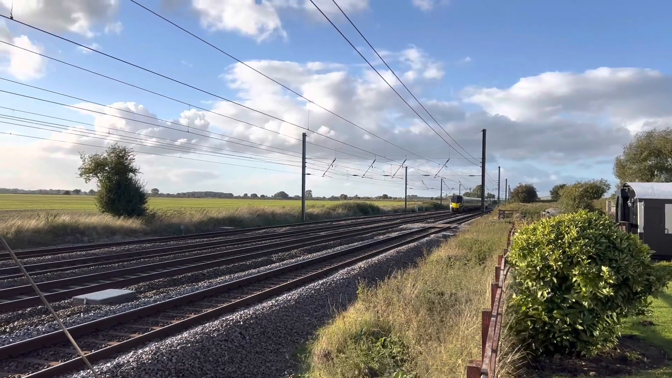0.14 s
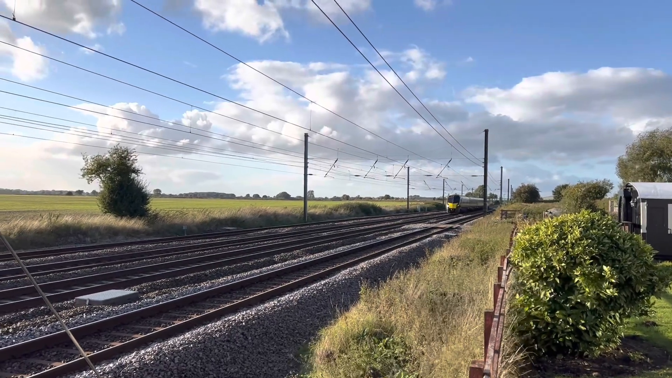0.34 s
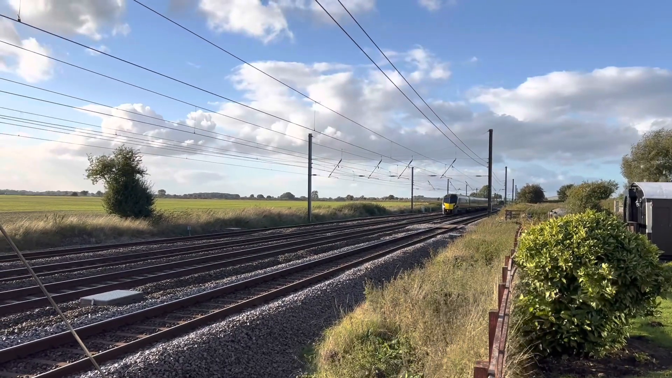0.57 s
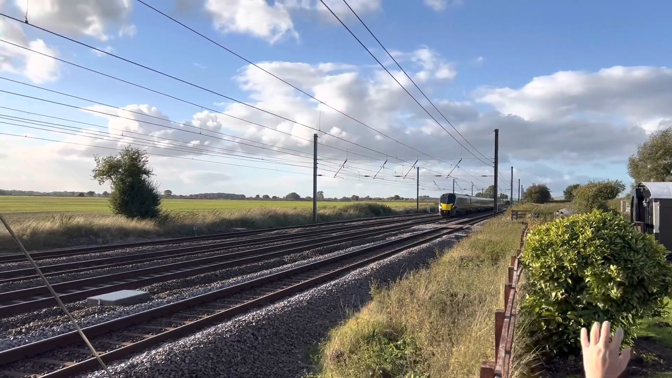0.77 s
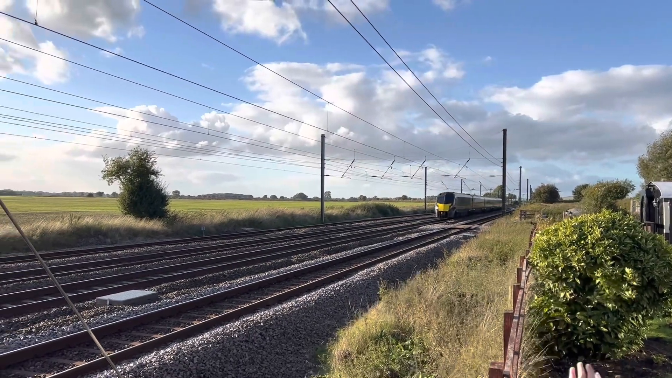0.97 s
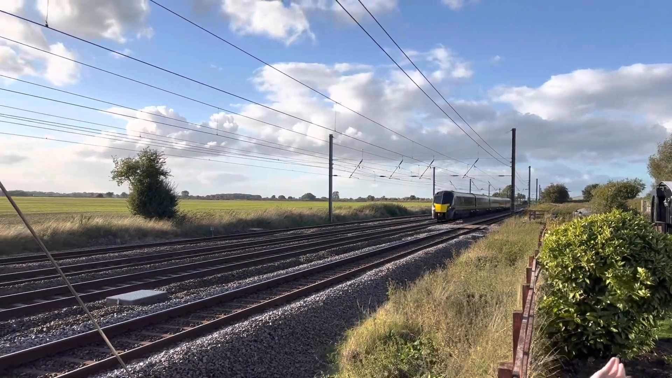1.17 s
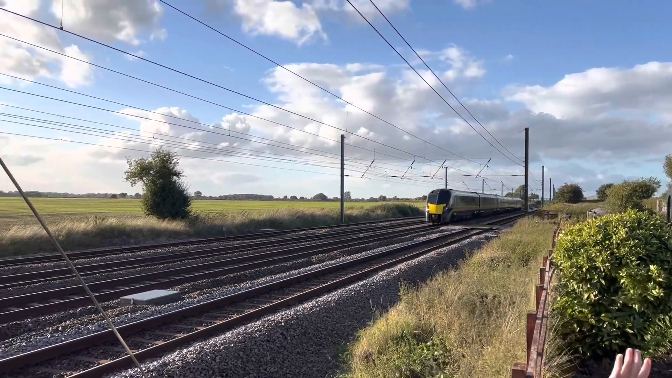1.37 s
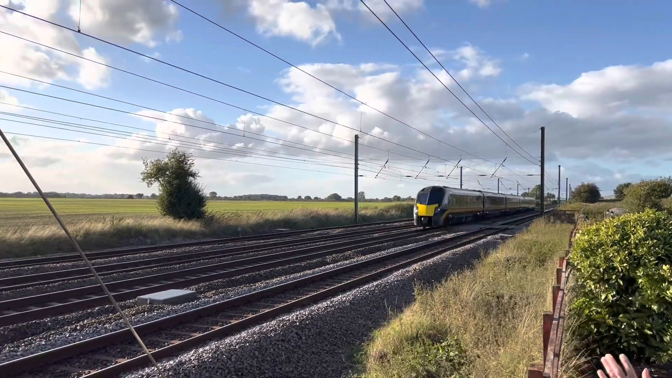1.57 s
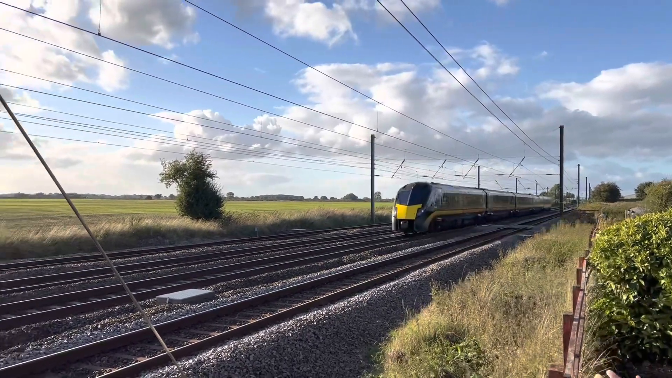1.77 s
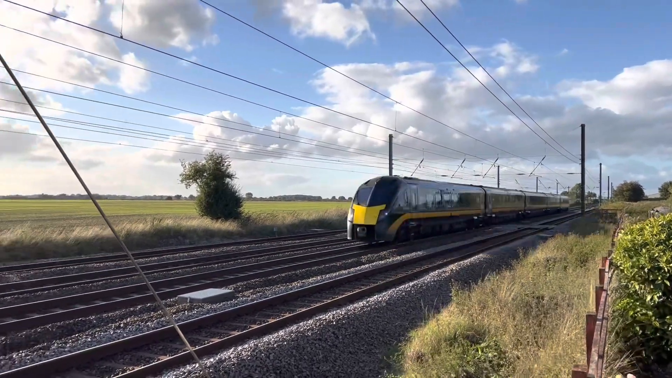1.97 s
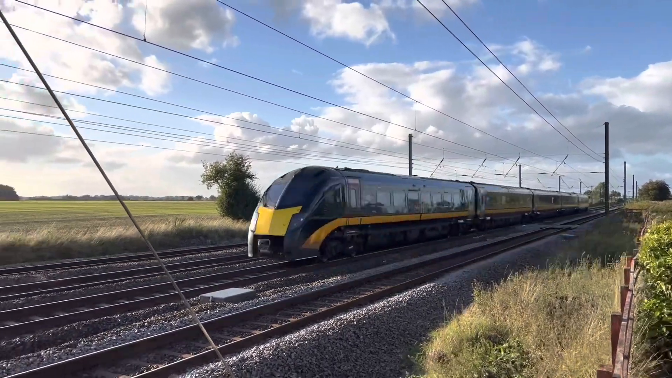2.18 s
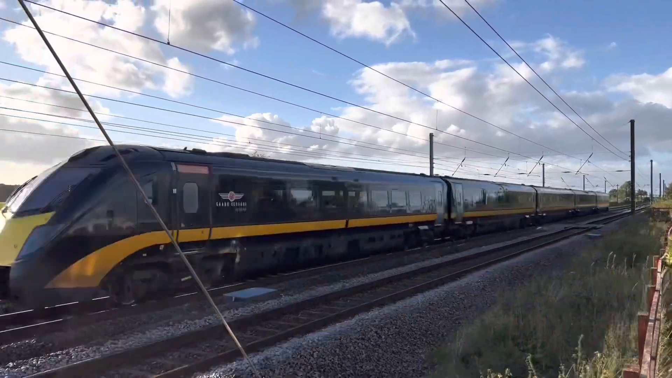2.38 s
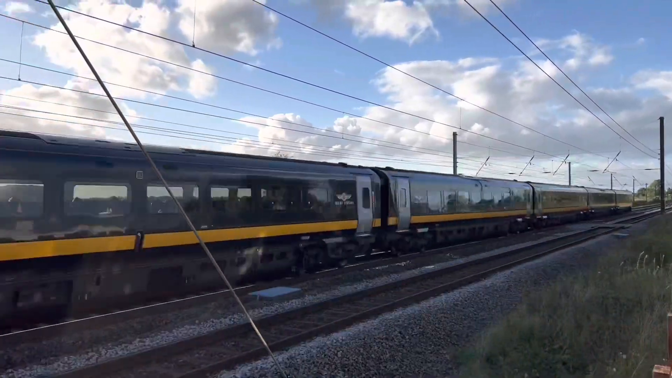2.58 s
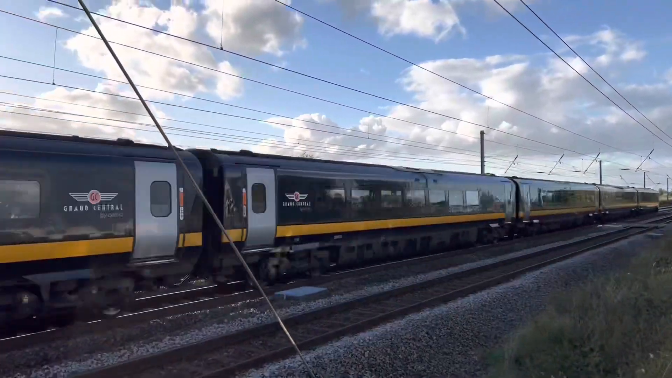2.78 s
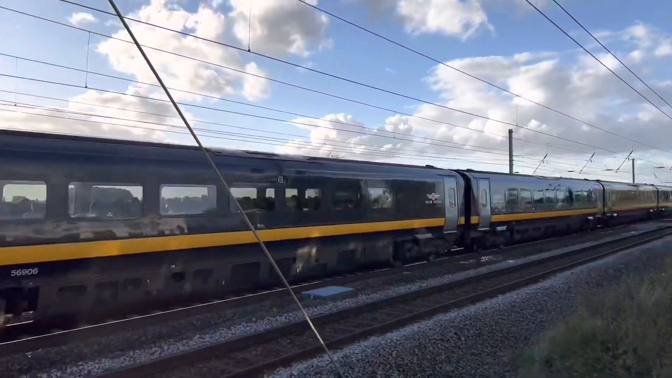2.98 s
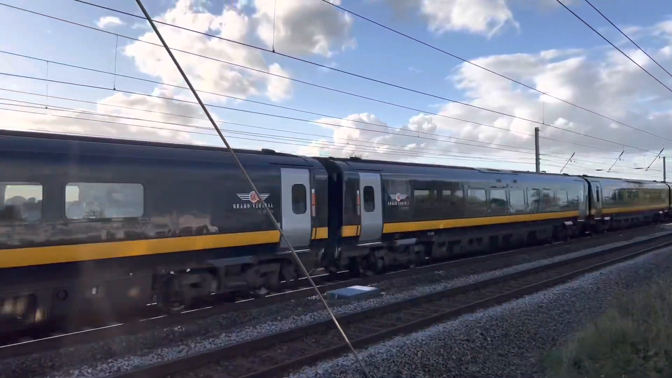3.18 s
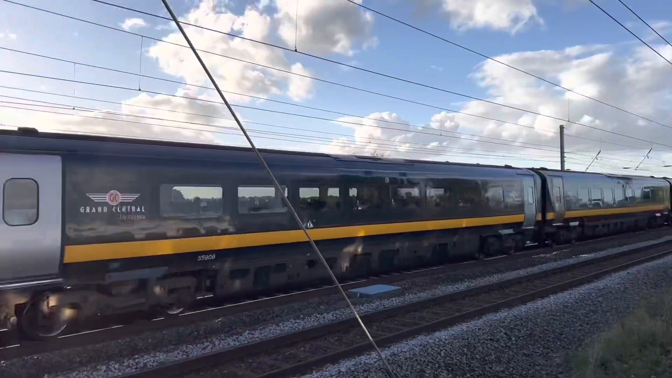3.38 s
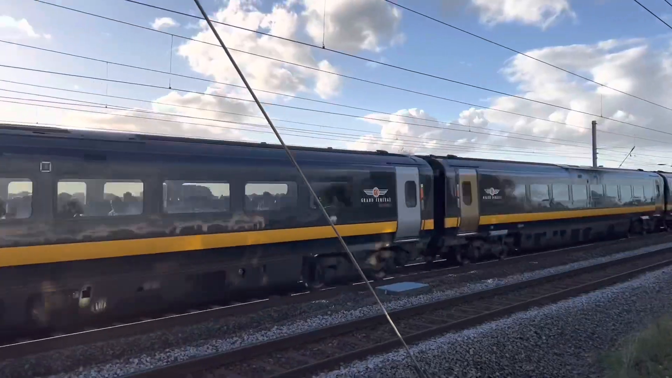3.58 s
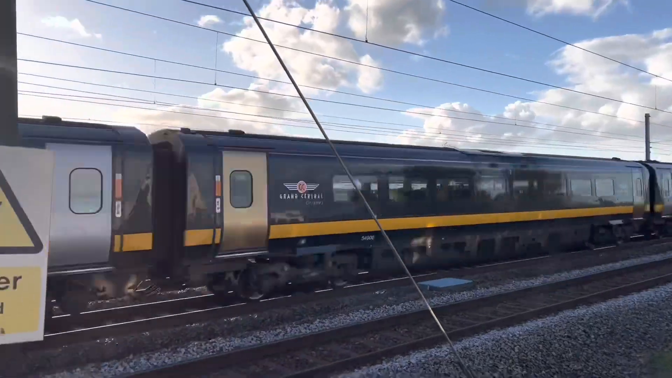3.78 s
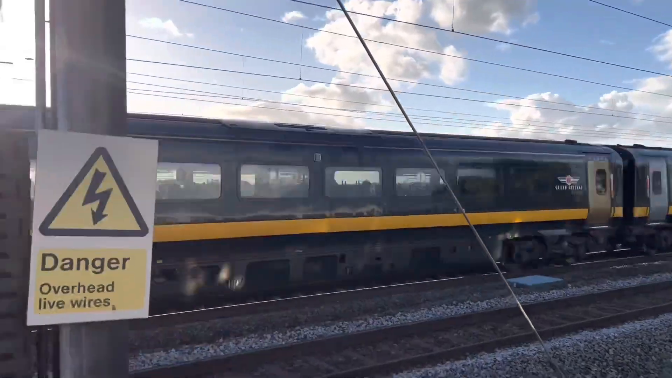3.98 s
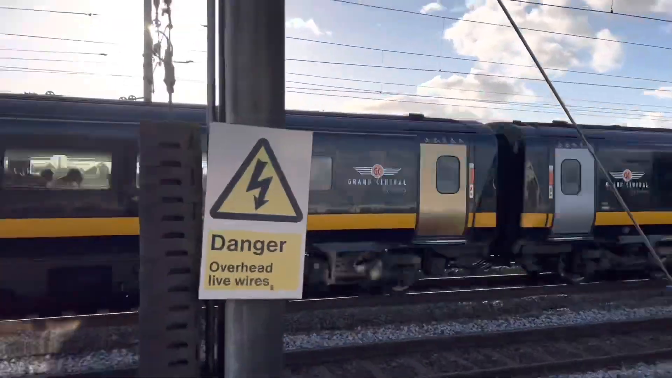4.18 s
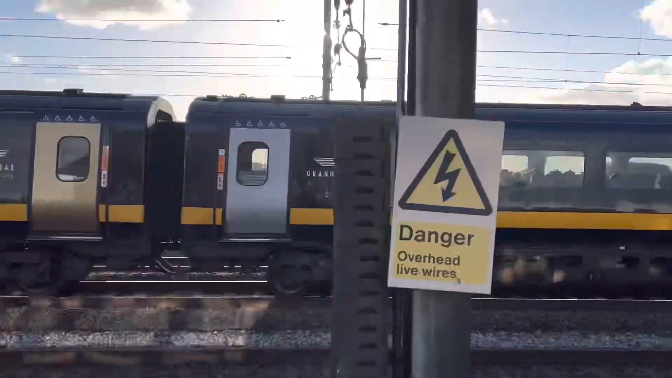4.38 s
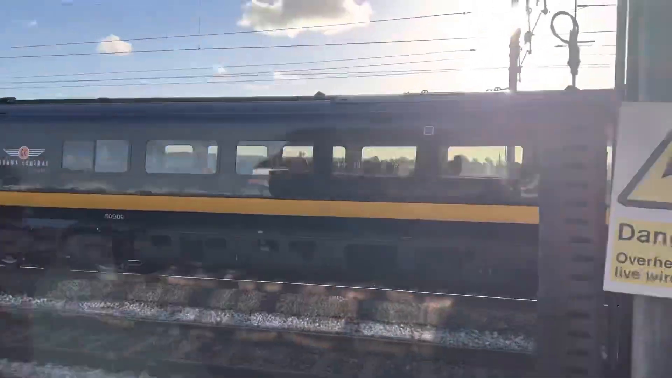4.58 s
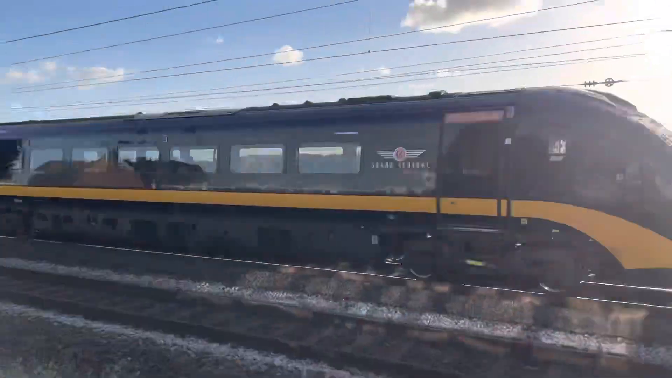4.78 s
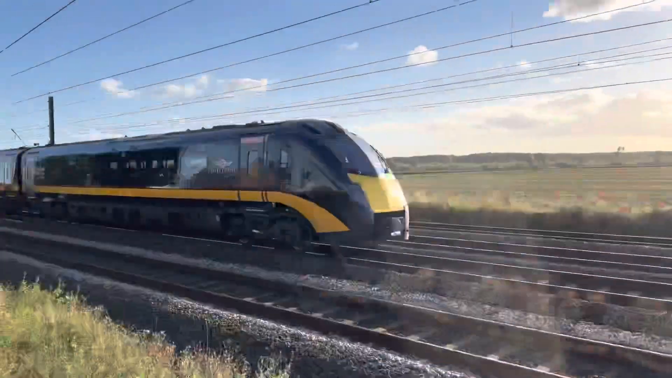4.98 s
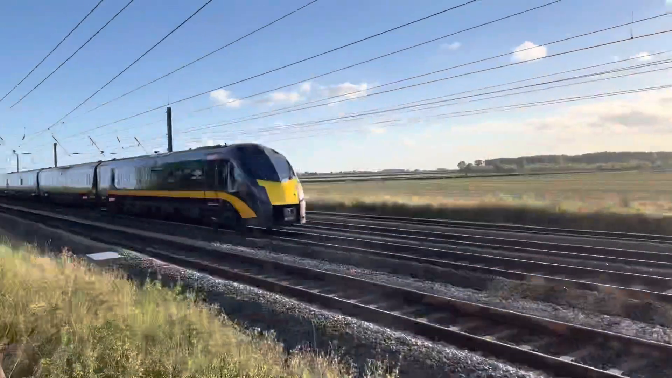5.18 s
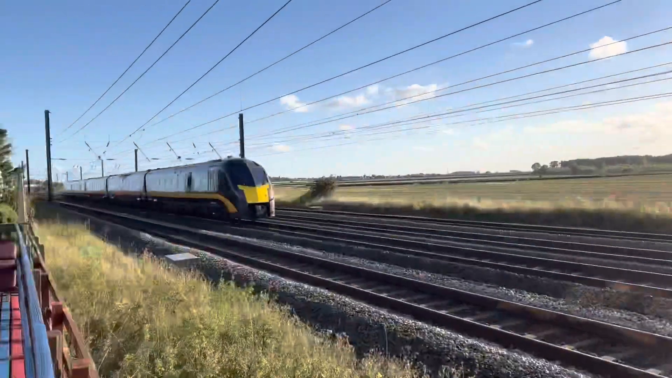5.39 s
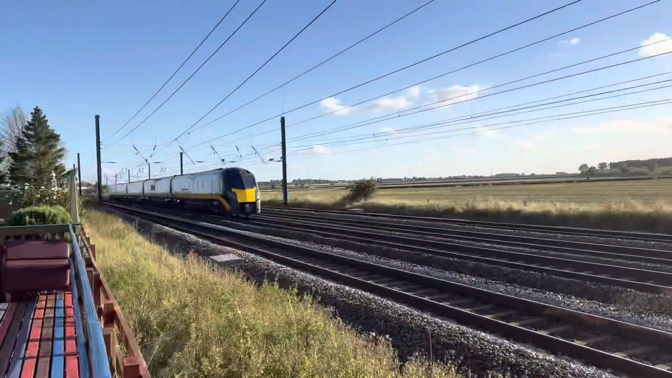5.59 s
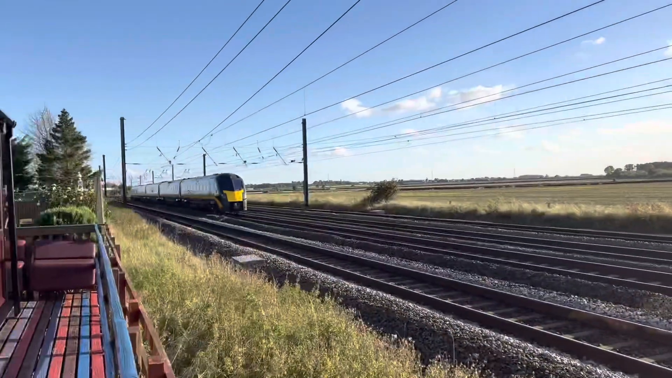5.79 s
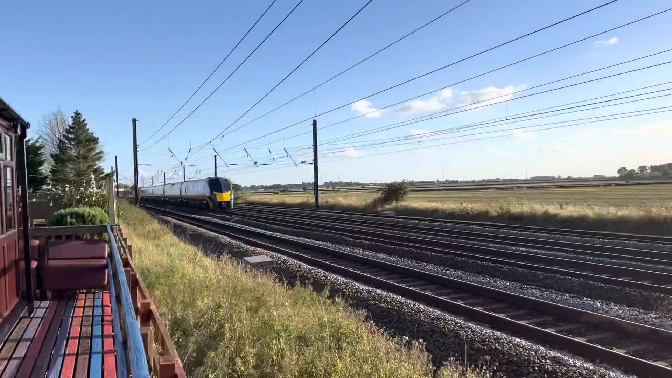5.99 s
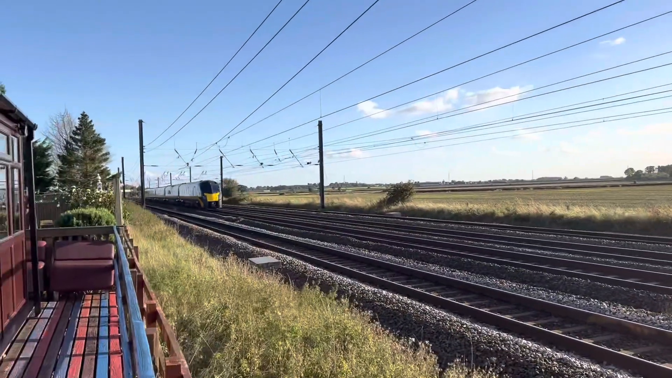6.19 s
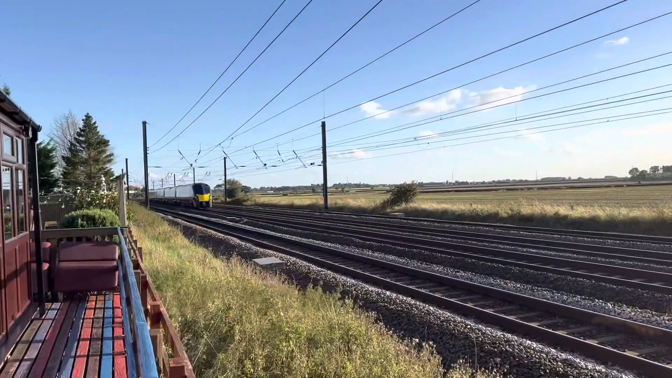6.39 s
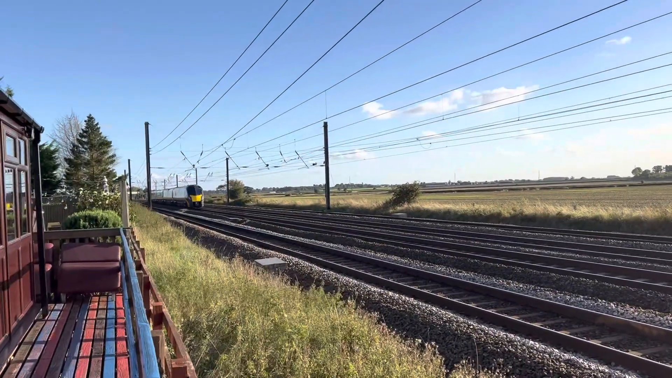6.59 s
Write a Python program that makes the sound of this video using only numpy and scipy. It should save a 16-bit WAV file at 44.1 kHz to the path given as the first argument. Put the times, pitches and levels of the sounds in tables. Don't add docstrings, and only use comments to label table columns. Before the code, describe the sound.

A fast train rushes past a few metres away in open fields, wheels roaring and gears whining downward, after blustery wind buffets the microphone.

```python
import sys
import numpy as np
from scipy import signal
from scipy.fft import rfft, irfft, next_fast_len
from scipy.io import wavfile
from scipy.ndimage import uniform_filter1d, map_coordinates

SR = 44100
rng = np.random.default_rng(int(sys.argv[2]) if len(sys.argv) > 2 else 0)


def field_ratio(decibels):
    return 10 ** (np.asarray(decibels, dtype=float) / 20)


def to_wav(sig):
    pcm = np.clip(np.atleast_2d(sig), -1, 1) * 32767
    pcm = np.round(pcm).astype(np.int16)
    wavfile.write(sys.argv[1], SR, pcm.T)


N = 292989

# t/s, nearness/dB, brightness/dB
TRAIN_PASS = [(0, -48.5, -3), (.37, -48, -1), (.61, -46, -2.5), (1.5, -40, .5), (1.8, -35.5, 0.5),
              (2.03, -30.5, 0.2), (2.25, -27, 0), (2.5, -22.5, -0.1), (2.75, -22, 1.5), (3.1, -24, .8),
              (3.4, -22.5, -0.6), (4.03, -25, -1.3), (4.48, -24.5, -.5), (4.65, -28, 0.5),
              (5.16, -35.5, 1.4), (5.4, -41.5, 2.5), (5.85, -43, 2), (6.64, -49.5, 1.5)]
# f/Hz, density/dB per Hz
ROAR_SPECTRUM = [(210, -67), (350, -15.5), (564, -7.5), (659, -2), (790, -3), (865, -4.5), (1290, -7.5),
                 (1330, -16), (1780, -10.5), (2500, -26.5), (3250, -57), (5500, -120)]
WHEEL_SPECTRUM = [(710, -39), (1200, -8), (1470, -1), (1710, -9), (1900, -4.5), (1990, -1), (2160, -4.5),
                  (2660, -5.5), (3080, -8), (4000, -9), (4870, -12.5), (6080, -14.5), (8500, -24.5),
                  (11000, -13), (18700, -120)]
HISS_SPECTRUM = [(1470, -38), (2500, -14.5), (3200, -8.5), (3920, -17), (4270, -24), (4630, -12),
                 (5920, -13), (7030, -9), (9000, -10), (11700, -59), (19800, -120)]
AIR_SPECTRUM = [(8700, -39), (9100, 6), (10200, -8), (11000, 4), (12500, -1.5), (13500, -3), (14300, -4),
                (15000, -9), (15800, -27)]
# f/Hz, likeness/0-1
TRAIN_LIKENESS = [(100, .9), (600, 0.71), (1200, 0.25), (2300, 0.69), (4000, 0.11), (7000, 0.3),
                  (9000, 0.18), (11000, 0.94), (13000, 0.74)]
# f/Hz, rms/dB
RAIL_AHEAD = [
    [(2062, -46), (2433, -51), (2745, -50), (3429, -54)],
    [(622, -47), (6869, -58), (7009, -66), (7553, -62), (7860, -64), (8183, -66), (8856, -65)] + [(11590, -62), (12269, -58), (12947, -64), (13625, -67), (14309, -67)],
]
# f/Hz, rms/dB
RAIL_BEHIND = [
    [(1927, -49), (2573, -60)],
    [(775.2, -52), (942.1, -52), (1157, -55), (1254, -52), (1739, -57), (1927, -56)] + [(3510, -61), (4027, -67), (5227, -66), (5884, -65), (6444, -66), (7084, -60), (7736, -60), (8080, -70), (8419, -68)] + [(11687, -64), (12328, -66), (12979, -68), (13641, -72), (14282, -72)],
]
# from/s, to/s, level/dB, swell/dB per s, fade/dB per s
RAIL_SONG = [
    (1.9, 5, 2.5, 50, 32),
    (0.96, 5.7, 3.5, 14, 22),
    (3, 5.27, 12, 70, 122),
    (4.6, 5.6, 4, 5, 5),
]
# t/s, rise/dB, half-length/s
SHIVERS = [(0.546, 6, 0.086), (0.847, 0, 0.029), (1.087, 2.5, 0.066), (1.535, 6.5, .1), (1.88, 4.5, 0.15),
           (2.486, 4.5, 0.089), (2.81, 3.5, 0.075), (4.5, 4, 0.1), (5.52, 3, 0.099), (5.952, 5, .04),
           (6.33, 2.5, 0.081)]
# start/s, length/s, middle f/Hz, width/Hz, level/dB
WHINES = [(2.1, .24, 1455, 30, -34.5), (2.63, 0.3, 2265, 160, -23), (3.4, .35, 2200, 97, -27.5),
          (2.9, 0.2, 1200, 30, -33), (2.98, 0.248, 655, 12, -27), (3.33, .24, 765, 13, -24),
          (3.95, .3, 1490, 60, -29), (4.3, .36, 1375, 45, -25), (4.8, .45, 1215, 45, -31),
          (4.24, .42, 690, 50, -21), (4.25, .43, 1990, 65, -28), (2.55, 0.188, 465, 30, -27.5),
          (4.65, .65, 3640, 80, -41), (4.72, .24, 700, 70, -30.5), (4.72, .18, 2025, 200, -27.5)]
# t/s, buffet/dB, flutter over buffet/dB
BREEZE = [(0, -31, -5.5), (.4, -27, -6.5), (.66, -31, -2), (.8, -24, -10), (1.1, -27, -3), (1.5, -21, -7),
          (1.72, -28, -3), (2.0, -25, -0.5), (2.3, -27.5, 1), (2.55, -20, -2), (2.95, -22.5, -3),
          (3.2, -27, -6.5), (3.55, -34, 4.5), (3.85, -26.5, -1.5), (4.3, -30, 0), (4.6, -26, 1),
          (5.4, -30.5, -3.5), (5.75, -39, -2)]
# start/s, hold/s, buffet/dB, flutter/dB
GUSTS = [(0.007, 0.028, -24.5, -28), (0.109, 0.018, -29, -24.5), (.172, 0.019, -20, -22.5),
         (0.243, .035, -23, -18.5), (0.287, 0.048, -24, -21.5), (0.443, .045, -24, -27.5),
         (.592, 0.0071, -37, -15.5), (0.704, .008, -18, -17), (.733, 0.039, -17, -16),
         (0.825, 0.052, -20.5, -20), (.903, 0.044, -17.5, -14.5), (0.992, 0.057, -15.5, -18),
         (1.152, 0.077, -22.5, -24.5), (1.28, .028, -20, -14.5), (1.32, 0.04, -19, -13),
         (1.39, 0.039, -18, -17), (1.562, 0.035, -15.5, -36), (1.76, 0.026, -22, -22.5),
         (1.817, 0.042, -19.5, -17), (1.869, 0.046, -22, -16), (1.931, 0.03, -18.5, -24.5),
         (2.076, .025, -31, -22.5), (2.35, 0.03, -19, -19.5), (2.983, 0.023, -20, -27),
         (3.285, 0.037, -25, -31), (3.743, .05, -21.5, -31), (3.966, 0.022, -17.5, -26),
         (5.533, .05, -26.5, -38), (6.049, .025, -25, -45), (6.377, 0.088, -21, -32)]
# t/s, peak/dB, length/ms
POPS = [(0.243, -29, 6.8), (0.29, -29, 7.3), (0.318, -23, 8.1), (0.591, -33, 5.8), (0.7, -28, 3.5),
        (0.736, -11.5, 8.2), (0.765, -19, 6), (0.852, -23, 6.5), (0.885, -20, 3.1), (0.907, -12, 3),
        (0.926, -8.5, 3), (0.996, -11.5, 5), (1.03, -13, 3.3), (1.113, -21, 6), (1.156, -14.5, 4),
        (1.206, -15, 5.5), (1.279, -17, 6), (1.29, -8.5, 8), (1.324, -10, 10.4), (1.341, -5.5, 7.3),
        (1.356, -9, 7.6), (1.389, -6.5, 9), (1.424, -14, 5.8), (1.476, -16, 4.3), (1.558, -18, 5.4),
        (1.607, -19, 4.1), (1.639, -17.5, 10), (1.817, -10.5, 9), (1.875, -16, 7.6), (1.898, -11, 4)]
# f/Hz, density/dB per Hz
BUFFET_SPECTRUM = [(13, -46), (22, -31), (42, -0.5), (76, 2.5), (220, -11), (290, -41), (480, -120)]
FLUTTER_SPECTRUM = [(110, -4.5), (170, -3.5), (300, -1.5), (500, -8), (800, -20), (1500, -56)]
RASP_SPECTRUM = [(200, -32), (400, 4.5), (700, 3), (1200, -8), (2200, -17), (3300, -33), (5000, -38.5),
                 (8000, -85)]
# f/Hz, density/dB per Hz
DRONE_SPECTRUM = [(500, -38), (620, -1), (900, -1.5), (1000, -1), (1280, -1), (1350, -25), (2500, -16.5),
                  (3000, -55)]
# f/Hz, left lead/rad
PORT_LEAD = [(0, 0), (1210, 2.0), (1640, -2.0), (1890, -1.0), (2930, 1.6), (3960, 6.0), (4820, 8.0),
             (6550, 12.8), (8440, 11.4), (9040, 9.6), (10900, 9.3), (12500, 6.3), (14700, 6.3),
             (15300, 3.3)]
# f/Hz, left minus right/dB
PORT_TILT = [(60, 1), (110, 0.0), (200, 12), (380, 4.5), (700, 3), (1290, 2.5), (2380, -1.0), (4400, 0.5),
             (8120, 0.5), (15000, 0.0)]
# f/Hz, gain/dB
SIDE_COLOUR = [(8800, 0), (9500, -4), (10900, -6), (11600, -1), (12300, 2)]
# low f/Hz, high f/Hz
GAP_HZ = (9050, 10950)


def rolling():
    near_db, bright_db = curves(TRAIN_PASS)
    abreast_near_db = -23

    def level_db(abreast_db, per_near, per_bright):
        return abreast_db + per_near * (near_db - abreast_near_db) + per_bright * bright_db

    swell, shiver_db = wobble(6.2), shivers()
    roar_db = level_db(-22, 0.67, -0.9) + 1.8 * swell + 0.42 * wobble(4.05)
    wheel_db = level_db(-19.5, 1.186, 0.1) + 0.6 * swell + 0.78 * wobble(15)
    hiss_db = level_db(-33.5, 0.8, 1.5) + 0.75 * shiver_db + 2.5 * swell
    air_db = level_db(-38.5, 0.48, 0.8) + shiver_db + 0.7 * swell + 0.68 * wobble(12)
    roar = field_ratio(roar_db) * rush(ROAR_SPECTRUM, TRAIN_LIKENESS, patchy_db=1.5)
    wheels = field_ratio(wheel_db) * rush(WHEEL_SPECTRUM, TRAIN_LIKENESS, patchy_db=1.5)
    hiss = field_ratio(hiss_db) * rush(HISS_SPECTRUM, TRAIN_LIKENESS, patchy_db=3.0)
    air = field_ratio(air_db) * rush(AIR_SPECTRUM, TRAIN_LIKENESS, patchy_db=1.5)
    return roar + wheels + hiss + air


def rails():
    t_s, shiver_db = np.arange(N) / SR, shivers()
    out = np.zeros((2, N))
    for law, lines in zip(RAIL_SONG, RAIL_AHEAD + RAIL_BEHIND):
        start_s, end_s, level_db, swell_db_s, fade_db_s = law
        song = np.zeros((2, N))
        for hz, db in lines:
            song += field_ratio(db + 2.7 * wobble(5)) * tone(hz, width_hz=16 + hz / 700, steady=0.45)
        before_s, after_s = np.maximum(start_s - t_s, 0), np.maximum(t_s - end_s, 0)
        song_db = level_db - swell_db_s * before_s - fade_db_s * after_s
        out += field_ratio(song_db + 0.46 * shiver_db) * song
    return out


def shivers():
    t_s = np.arange(N) / SR
    return sum(db * np.exp(-((t_s - s) / half_s) ** 2) for s, db, half_s in SHIVERS)


def whines():
    doppler_drop = 0.085
    out, t_s = np.zeros((2, N)), np.arange(N) / SR
    for start_s, length_s, hz, width_hz, db in WHINES:
        u = np.clip((t_s - start_s) / length_s, 0, 1)
        slide = 1 - u - np.sin(np.pi * u / 2) ** 2
        pitch_hz = hz * (1 + doppler_drop * slide / 2)
        swell = np.abs(np.sin(np.pi * u)) ** 0.67
        out += field_ratio(db) * swell * tone(pitch_hz, 1.7 * width_hz, steady=0)
    return out


def wind():
    push, flap = gusts()
    lumps, spikes = wobble(25), wobble(80)
    buffet = field_ratio(1.7 * lumps) * rush(BUFFET_SPECTRUM, [(40, 1.0), (80, 0.87)], patchy_db=1.4)
    flutter = field_ratio(2.6 * spikes) * rush(FLUTTER_SPECTRUM, [(200, 0.92), (1500, 0.8)], patchy_db=1.45)
    rasp = rush(RASP_SPECTRUM, [(500, 0.82), (3000, 0.8)], patchy_db=-0.5)
    rasp_gain = flap ** 1.66 * field_ratio(-7 + 3.5 * spikes)
    t_s = np.arange(SR // 10) / SR
    for s, db, length_ms in POPS:
        start = round(s * SR)
        u = t_s[:N - start] / (length_ms / 3000 + 0.000095)
        rasp_gain[start:][:len(u)] += field_ratio(db + 9) * u ** 2 * np.exp(-1.5 * u)
    return push * evened(buffet, 0.05) + flap * evened(flutter, 0.036) + rasp_gain * evened(rasp, 0.006)


def gusts():
    rise_s, fall_s = 0.0052, 0.0095
    t_s = np.arange(N) / SR
    buffet_db, over_db = curves(BREEZE)
    power = field_ratio([buffet_db, buffet_db + over_db]) ** 2
    for s, hold_s, *db in GUSTS:
        rise = (np.minimum(t_s - s, 0) / rise_s) ** 2
        fall = np.maximum(t_s - s - hold_s, 0) / fall_s
        power = power + (field_ratio(db)[:, None] * np.exp(-rise - fall)) ** 2
    return np.sqrt(power)


def field():
    return field_ratio(-40.5 + 0.6 * wobble(2.5)) * rush(DRONE_SPECTRUM, [(600, 0.7), (1200, 0.8)], patchy_db=3.2)


def rush(spectrum, alike, patchy_db):
    z = signal.stft(rng.standard_normal((2, N)), nperseg=512)[2]
    patches = uniform_filter1d(rng.standard_normal(z.shape[1:]), size=4, axis=0)
    patches = uniform_filter1d(patches, size=12, axis=1)
    pair = signal.istft(z * field_ratio(patchy_db * unit(patches)), nperseg=512)[1][:, :N]

    def mid_side(hz):
        angle = np.arccos(np.clip(along(alike, hz), -1, 1)) / 2
        return field_ratio(along(spectrum, hz)) * [np.cos(angle), np.sin(angle)]

    mid, side = filtered(pair, mid_side)
    return unit(np.array([mid + side, mid - side]))


def tone(hz, width_hz, steady):
    drift = lambda: wobble(width_hz, order=1) + 1j * wobble(width_hz, order=1)
    shared = steady + drift()
    carrier = np.exp(2j * np.pi * np.cumsum(np.broadcast_to(hz, N)) / SR)
    return unit((carrier * [shared + 0.69 * drift(), shared + 0.62 * drift()]).real)


def evened(x, seconds):
    power = np.abs(uniform_filter1d(np.mean(x ** 2, axis=0), int(seconds * SR)))
    return unit(x / np.sqrt(power + 0.22))


def wobble(rate_hz, order=3):
    knots = rng.standard_normal(int(N * rate_hz / SR) + 4)
    return map_coordinates(knots, [np.arange(N) * rate_hz / SR], order=order)


def curves(rows):
    s, *cols = np.transpose(rows)
    return [np.interp(np.arange(N) / SR, s, c) for c in cols]


def along(points, hz):
    f, v = np.transpose(points)
    return np.interp(np.log(hz + 1), np.log(f + 1), v)


def filtered(x, response):
    m = next_fast_len(N + 8192)
    return irfft(rfft(x, m) * response(np.fft.rfftfreq(m, 1 / SR)), m)[..., :N]


def unit(x):
    return x / np.sqrt(np.mean(x ** 2) + 1e-20)


def scene():
    def ports(hz):
        lead_rad = np.interp(hz, *np.transpose(PORT_LEAD))
        left = field_ratio(along(PORT_TILT, hz) / 2) * np.exp(0.5j * lead_rad)
        return left ** np.array([[1], [-1]])

    return filtered(rolling() + rails() + whines() + field(), ports) + wind() * field_ratio([[0.1], [-0.1]])


def top_cut(x):
    return signal.sosfilt(signal.butter(12, 15740, fs=SR, output="sos"), x)


def record(dry):
    left, right = dry / (1 + np.abs(dry / 0.95) ** 6) ** (1 / 6)
    bass_cut = lambda hz: 1 / (1 + (32 / (hz + 1)) ** 4)
    outside_gap = lambda hz: (hz < GAP_HZ[0]) | (hz > GAP_HZ[1])
    mid = filtered(left + right, lambda hz: bass_cut(hz) * outside_gap(hz)) / 2
    side = filtered(left - right, lambda hz: bass_cut(hz) * field_ratio(along(SIDE_COLOUR, hz))) / 2
    return top_cut(np.array([mid + side, mid - side]))


dry = scene()
out = record(dry)
to_wav(out)
```